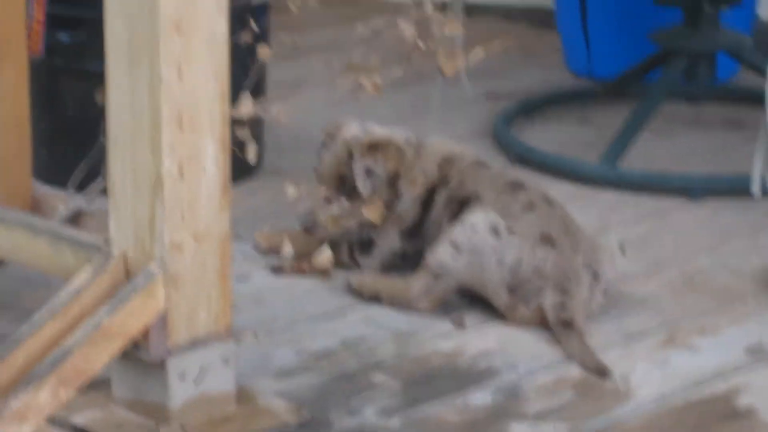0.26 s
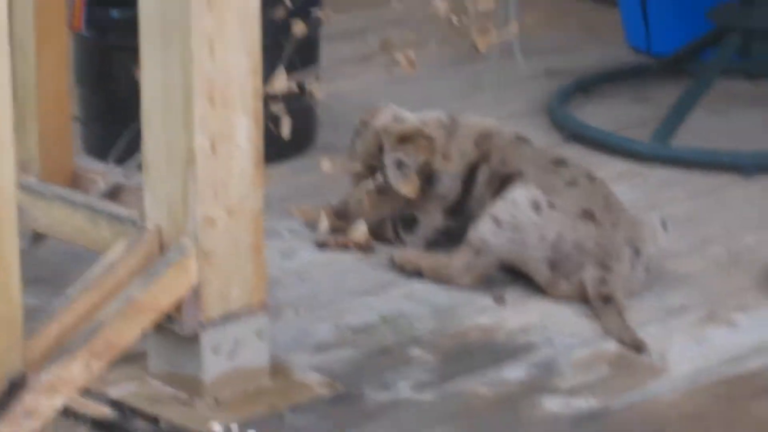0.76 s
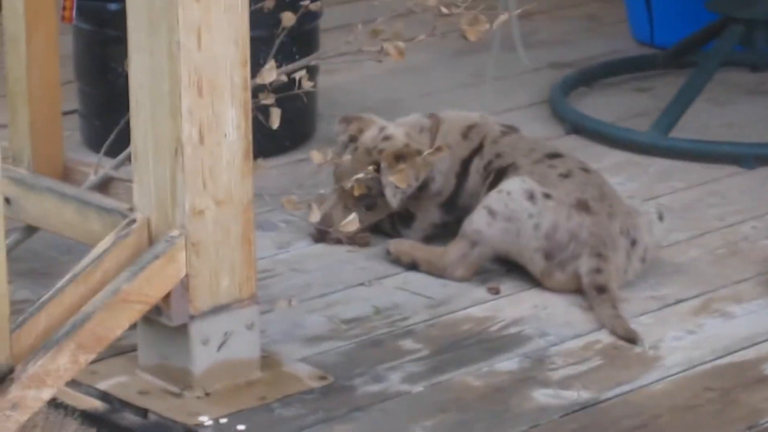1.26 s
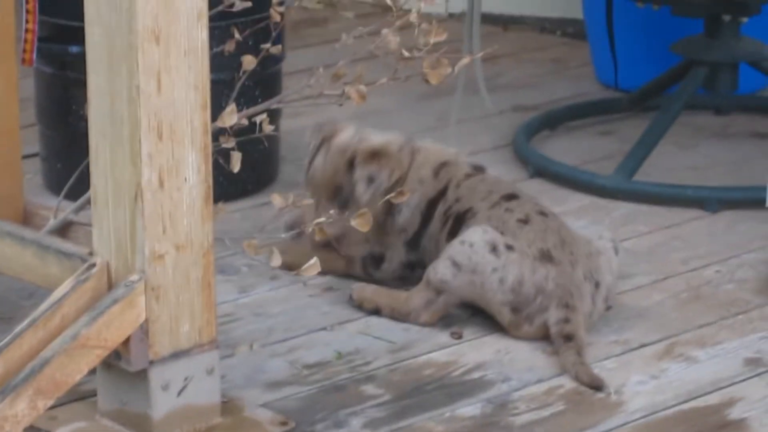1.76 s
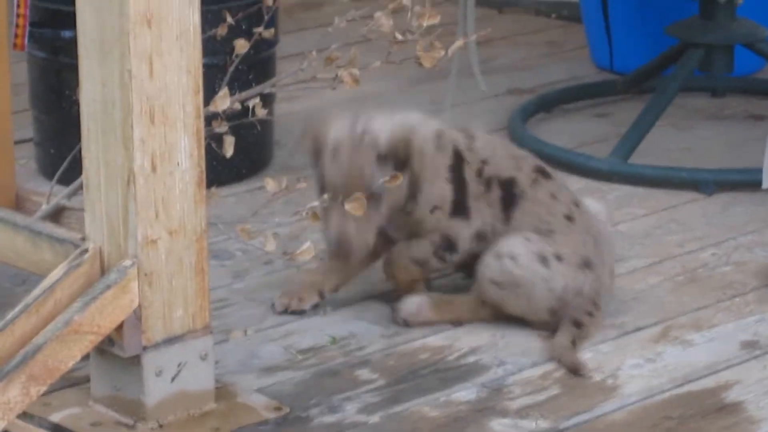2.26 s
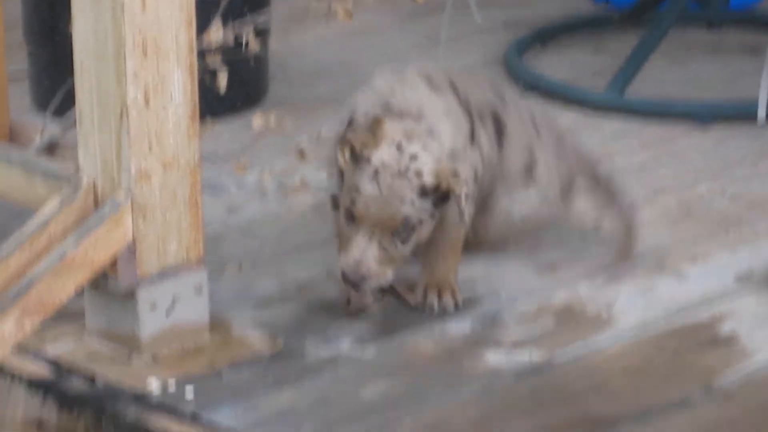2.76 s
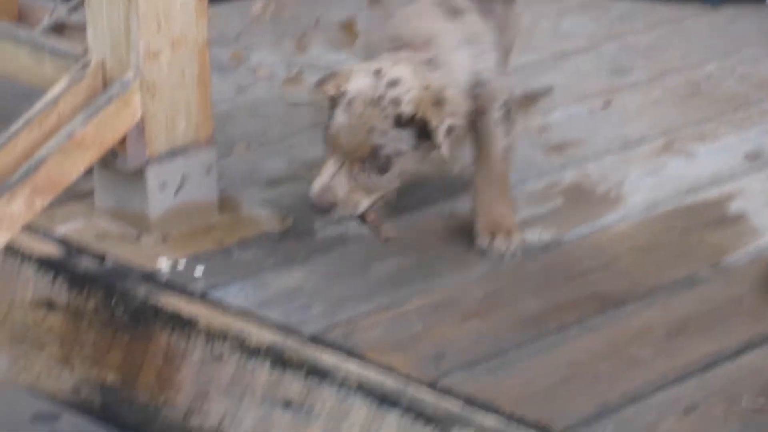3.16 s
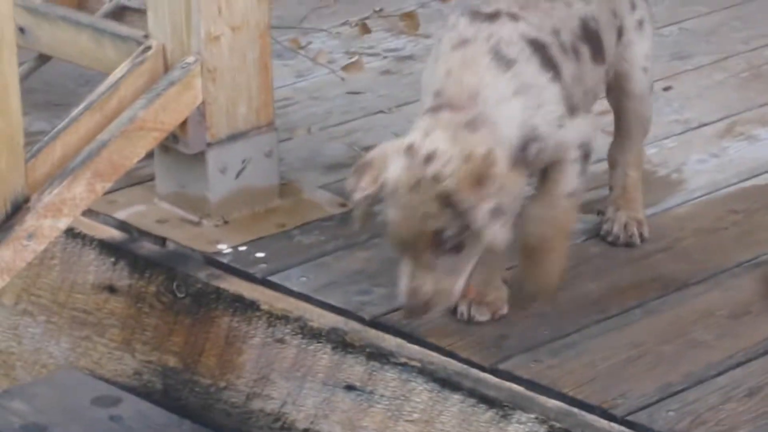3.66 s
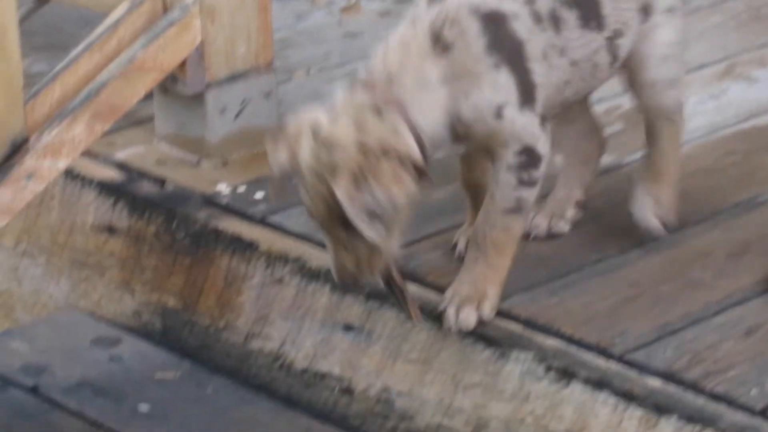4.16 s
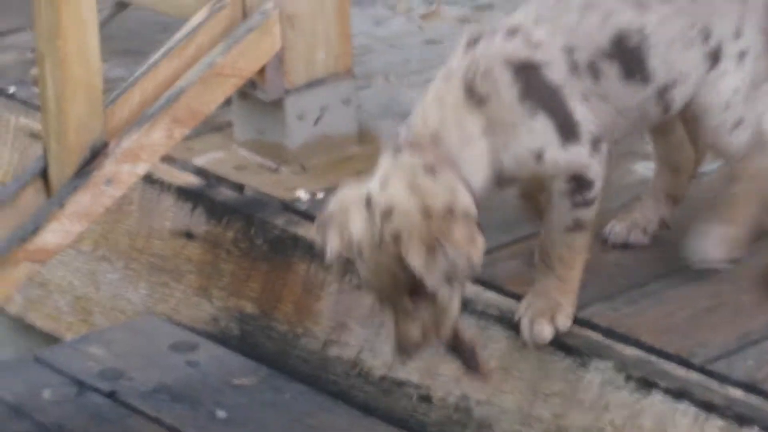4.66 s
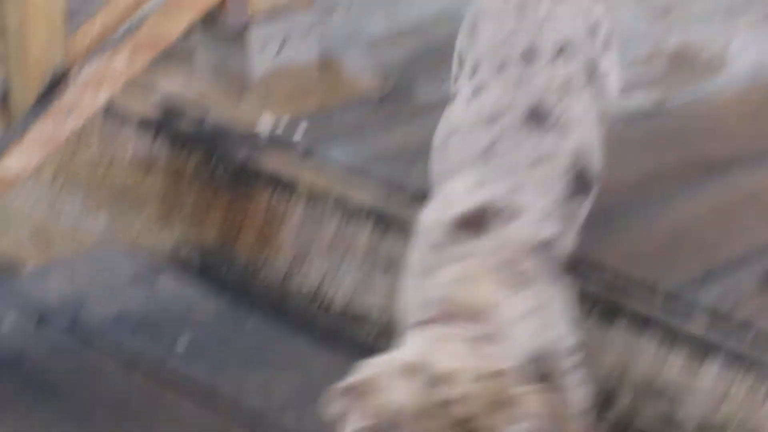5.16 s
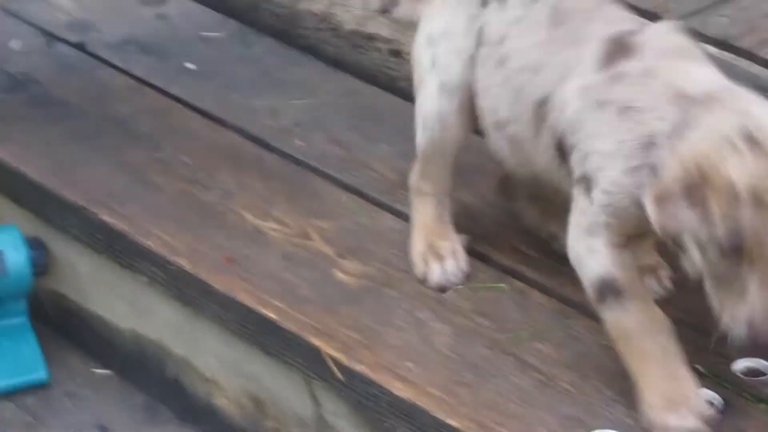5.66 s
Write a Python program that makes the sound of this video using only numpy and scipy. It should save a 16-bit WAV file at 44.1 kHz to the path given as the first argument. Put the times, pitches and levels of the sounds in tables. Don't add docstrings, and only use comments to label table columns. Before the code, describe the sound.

A puppy stirs on a wooden deck with one sharp close claw knock and soft pad thuds, while small birds chirp over a faint outdoor hush.

```python
import sys
import numpy as np
from scipy import signal
from scipy.fft import rfft, irfft, next_fast_len
from scipy.io import wavfile
from scipy.ndimage import uniform_filter1d

SR = 44100
rng = np.random.default_rng(int(sys.argv[2]) if len(sys.argv) > 2 else 0)


def unload_audio(sound):
    columns = np.transpose(np.atleast_2d(sound))
    steps = np.round(np.clip(columns, -1, 1) * 32767)
    wavfile.write(sys.argv[1], SR, steps.astype(np.int16))


def voltage_ratio(level):
    return 10 ** (np.asarray(level, float) / 20)


N = 260190
TOP_HZ = 10560


def along(points, hz):
    f, v = np.transpose(points)
    return np.interp(np.log(hz + 1), np.log(f + 1), v)


def curves(rows, t):
    s, *cols = np.transpose(rows)
    return [np.interp(t, s, c) for c in cols]


def filtered(x, response):
    m = next_fast_len(N + 8192)
    return irfft(rfft(x, m) * response(np.fft.rfftfreq(m, 1 / SR)), m)[..., :N]


def noise(response, patchy_db):
    z = signal.stft(rng.standard_normal(N + 512), nperseg=512)[2]
    field = uniform_filter1d(rng.standard_normal(z.shape), 6, 0)
    field = uniform_filter1d(field, 10, 1)
    patchy = signal.istft(z * voltage_ratio(patchy_db * field / field.std()), nperseg=512)[1][:N]
    x = filtered(patchy, response)
    return x / x.std()


def add(bus, s, x):
    part = bus[round(s * SR):][:len(x)]
    part += x[:len(part)]


def clock(ms):
    return np.arange(round(ms * SR / 1000)) / SR


def strokes(rows):
    t = np.arange(N) / SR
    power = 0
    for s, db, fall in rows:
        away = np.maximum((t - s) / fall, (s - t) / (0.5 * fall))
        power = power + voltage_ratio(db - 20 * away) ** 2
    return np.sqrt(power)


# start in seconds, peak in dB, brightness in dB.
CLAW_TAPS = [(0.241, -46, 2), (0.313, -37.5, 8), (2.379, -31, -14), (2.612, -58, -23), (3.077, -46, 13),
             (5.037, -42, -2), (5.042, -33, 2), (5.046, -34, 5), (5.151, -39, 13.5), (5.172, -36, 10),
             (5.526, -39.5, 3), (5.66, -34, -7), (5.692, -50, -21), (5.697, -35, -19), (5.702, -44, -12),
             (5.705, -41, -15), (5.72, -52, -10), (5.798, -38, -21), (5.806, -42, -23)]
# start in seconds, peak in dB, brightness in dB, ring as a ratio.
CLOSE_KNOCKS = [
    (2.397, -16.5, -15, .45),
    (2.4085, -22, -10, .6),
    (2.4117, -1.2, 0, .27),
    (2.4146, -16, -7, .6),
    (2.419, -16.5, -20, .5),
    (5.879, -21.5, -19, .21),
]
# pitch in Hz, level in dB, t60 in seconds, share of brightness 0-1.
BOARD_MODES = [(700, -15, 0.024, 0), (1060, -5.5, 0.069, 0.3), (1770, 1, 0.042, 0.1),
               (2050, -9, 0.074, 0.3), (2910, -1, 0.035, 0.86), (4460, -1.5, 0.0214, 0.46),
               (4710, -2, 0.021, 1), (6550, -9, 0.013, 1), (7800, -14, 0.016, 1), (9200, -12, 0.012, 0.8)]


def claws():
    bus, t = np.zeros(N), clock(120)
    onset = np.sin(np.pi / 2 * np.minimum(t / .0007, 1)) ** 2
    taps = [(s, db, bright_db, 0.26 * np.exp(-0.06 * bright_db)) for s, db, bright_db in CLAW_TAPS]
    for s, db, bright_db, ring in taps + CLOSE_KNOCKS:
        modes = 0
        for hz, level, t60, share in BOARD_MODES:
            mode_db = level + share * bright_db + rng.normal(0, .4)
            modes = modes + voltage_ratio(mode_db - 60 * t / (ring * t60)) * np.sin(2 * np.pi * hz * t)
        add(bus, s, voltage_ratio(db - 1) * modes * onset)
    bus = signal.sosfilt(signal.butter(3, 620, "high", fs=SR, output="sos"), bus)
    return signal.lfilter(*signal.iirnotch(3680, 5, SR), bus)


# start in seconds, peak in dB, board pitch in Hz.
PAD_STEPS = [(2.3, -37, 101), (2.407, -40, 132), (2.576, -40, 148), (2.63, -47, 111), (4.965, -51, 513.5),
             (5.039, -43, 470), (5.046, -34, 627), (5.053, -43, 346), (5.059, -40, 197),
             (5.086, -40, 139.2), (5.13, -48, 126), (5.19, -45, 195), (5.154, -40, 243), (5.533, -40, 344),
             (5.657, -40, 555), (5.722, -36, 553), (5.75, -41, 545), (5.676, -41, 168), (5.716, -45, 402),
             (5.728, -38, 183)]
# start in seconds, peak in dB, pitch in Hz, t60 in seconds.
FLAT_PAD = (5.3064, -28.5, 240, .016)


def pads():
    bus, t = np.zeros(N), clock(120)
    steps = [(s, db, hz, 13 / hz) for s, db, hz in PAD_STEPS]
    for s, db, hz, t60 in steps + [FLAT_PAD]:
        soft_onset = 1 - np.exp(-t * hz * 3)
        add(bus, s, voltage_ratio(db - 60 * t / t60) * np.sin(2 * np.pi * hz * t) * soft_onset)
    return bus


# frequency in Hz, level in dB.
DRAG_COLOUR = [(250, -39), (600, -5), (1000, 3), (1800, -10.5), (3500, -12.5), (8000, -22), (11000, -30)]
# peak time in seconds, peak in dB, seconds to fall 20 dB.
DRAG_STROKES = [
    (.15, -51.5, .15),
    (.2, -50, 0.23),
    (.85, -57, 1.2),
    (2.36, -53, 0.23),
    (2.7, -61.5, 3.5),
    (3.5, -77, 0.47),
    (4.87, -58, 0.44),
    (5.04, -54, 0.065),
    (5.9, -54.5, 1.7),
]


def drags():
    rub = noise(lambda hz: voltage_ratio(along(DRAG_COLOUR, hz)), patchy_db=4)
    return voltage_ratio(3.5) * strokes(DRAG_STROKES) * rub


def puppy():
    return claws() + pads() + drags()


# frequency in Hz, level in dB.
BEAK_GAIN = [(1500, -10.5), (2500, -2), (4500, -4), (6500, 2), (9000, -1), (10200, -3), (11000, -18)]


def voice(pitch, partials_db, edge, flutter_db=3):
    phase = 2 * np.pi * np.cumsum(pitch) / SR
    knots = rng.standard_normal((4, 80))
    tone = 0
    for k, db in enumerate(partials_db, 1):
        flicker_db = flutter_db * np.interp(np.arange(len(pitch)) / SR * 500, np.arange(80), knots[k - 1])
        gain = voltage_ratio(db + along(BEAK_GAIN, k * pitch) + flicker_db) * (k * pitch < SR / 2)
        tone = tone + gain * np.sin(k * phase)
    return np.sqrt(2) * tone * signal.windows.tukey(len(pitch), np.clip(edge, 0, 1))


# delay in ms, level in dB.
WALL_ECHOES = [(4.5, -8), (9, -11), (15, -13)]
# frequency in Hz, t60 in seconds.
YARD_DECAY = [(1500, 0.15), (4000, 0.17), (7000, 0.17), (10500, 0.25)]
# frequency in Hz, level in dB.
SCATTER_COLOUR = [(1500, -2), (3000, -1), (5500, 2), (9000, -1.5), (11000, -6.5)]


def in_yard(note, echo_db):
    hz, t, z = signal.stft(rng.standard_normal(SR // 6), SR, nperseg=128)
    decay_db = along(SCATTER_COLOUR, hz)[:, None] - 60 * t / along(YARD_DECAY, hz)[:, None]
    tail = signal.istft(z * voltage_ratio(decay_db), SR, nperseg=128)[1]
    answer = voltage_ratio(2.5) * tail / np.linalg.norm(tail)
    chances = rng.standard_normal((len(WALL_ECHOES), 34))
    for (ms, db), (shift, size, *rough) in zip(WALL_ECHOES, chances):
        blur = np.array(rough) / np.sqrt(32)
        answer[round((ms + shift) * SR / 1000):][:32] += voltage_ratio(db + 2.5 * size) * blur
    answer *= voltage_ratio(echo_db)
    answer[0] += 1
    return signal.fftconvolve(note, answer)


# start in seconds, fall time in ms, level in dB.
OPEN_PERCH = [(0.239, 4.4, -59), (1.1498, 7.4, -50.5), (1.8265, 5.4, -52.5), (2.0056, 6.2, -44.5),
              (2.0953, 5.0, -53.5), (2.87, 6, -42), (2.9864, 6.5, -43.5), (3.1268, 3.8, -48),
              (3.2785, 2.8, -55.5), (3.663, 4.0, -49), (3.811, 5.1, -42), (4.644, 7.7, -56)]
FENCE_PERCH = [(0.5216, 3.3, -65), (0.5817, 2.3, -60), (0.6951, 4.4, -64), (0.884, 2.3, -64),
               (1.4128, 5.9, -56), (2.1487, 4.3, -57), (3.2396, 4.1, -49), (4.8284, 3.5, -53),
               (5.2271, 2.9, -45.5), (5.4325, 3.7, -51.5), (5.4522, 4, -54), (5.568, 4.0, -49.5),
               (5.852, 3.8, -55.5)]
HIDDEN_PERCH = [
    (1.6914, 4.2, -59.5),
    (2.3553, 4.5, -50),
    (3.697, 4, -48.5),
    (3.928, 2.7, -57.5),
    (5.7127, 3.8, -54),
]
ROOF_PERCH = [
    (1.582, 3.3, -67.5),
    (1.934, 5, -64.5),
    (4.2125, 4.9, -60.5),
    (4.2256, 5.5, -58.5),
    (4.4104, 6.7, -69),
]
# overtones in dB, echo in dB.
PERCH_SOUND = [
    (4, -3.5),
    (-5.5, 2.4),
    (-3.5, 2),
    (1, 8),
]


def chips():
    bus, t = np.zeros(N), clock(15.8)
    perches = (OPEN_PERCH, FENCE_PERCH, HIDDEN_PERCH, ROOF_PERCH)
    for rows, (perch_db, echo_db) in zip(perches, PERCH_SOUND):
        for s, fall_ms, db in rows:
            over_db = perch_db - 0.35 * (fall_ms - 6.2)
            pitch = 1850 + 6800 * np.exp(-(1000 * t / (fall_ms + 1.7)) ** 1.7)
            note = voice(pitch, [0, over_db - 5, over_db - 8, over_db - 11], edge=.13)
            note = note * voltage_ratio(db + 5.5 - 330 * t)
            add(bus, s - .0022, in_yard(note, echo_db + .3))
    return bus


# start in seconds, start pitch in Hz, level in dB.
NEAR_CHATTER = [
    (0.348, 3550, -61),
    (4.025, 3110, -47.5),
    (4.107, 3250, -48),
    (4.4278, 3380, -49),
    (4.504, 3400, -48),
    (4.583, 3230, -48.5),
    (4.6623, 3420, -47.5),
    (4.745, 3140, -48.5),
    (4.834, 3280, -48.5),
]
# start in seconds, start pitch in Hz, level in dB.
DISTANT_CHATTER = [
    (0.08, 3040, -64.5),
    (0.111, 2890, -59.5),
    (0.243, 2930, -59.5),
    (0.302, 3290, -59),
    (0.5108, 2590, -58),
    (0.631, 2990, -62),
    (0.7034, 3421, -83),
    (1.2026, 3150, -62.5),
    (4.9535, 2750, -61),
]
# start in seconds, start pitch in Hz, level in dB, overtones in dB.
NASAL_NOTES = [(0.2084, 2110, -46.5, -0.5), (0.3298, 1994, -46, 1), (0.7002, 2084, -50.5, 3),
               (1.0824, 2090, -52.5, 7), (1.121, 2250, -55.5, 12.5), (1.292, 1984, -53, 3.5),
               (1.4532, 2107, -40.5, -1), (3.1798, 2024, -44.5, -6), (3.197, 2020, -53, 3),
               (3.259, 2260, -53, 1), (3.286, 2000, -48, -8), (3.3255, 2050, -51, 1),
               (3.5325, 2030, -47.5, -3), (3.5462, 2060, -49.5, -0.5), (4.197, 2050, -50, 1),
               (4.215, 1950, -49, -5), (4.238, 2110, -54, -1), (5.177, 1950, -52, 5.5),
               (5.187, 1925, -56, 4)]
# note in ms, end pitch over start, 2nd partial in dB, 3rd in dB, far wall in dB.
CALLER_VOICES = [
    (18, .63, -3, 1.2, -4),
    (18, 0.56, 6, 3, -11),
    (20, .91, -6.5, -8, -42),
]
CALLER_ECHO = [
    -5,
    -5,
    -8,
]


def calls():
    bus = np.zeros(N)
    callers = (NEAR_CHATTER, DISTANT_CHATTER, NASAL_NOTES)
    for rows, caller, echo_db in zip(callers, CALLER_VOICES, CALLER_ECHO):
        ms, drop, second_db, third_db, again_db = caller
        t = clock(ms + 3.3)
        for s, start_hz, db, *over_db in rows:
            upper_db = np.array([second_db - 1.0, third_db - 4.0, third_db - 9.5]) + sum(over_db)
            pitch = start_hz * (1 - (1 - drop) * (1000 * t / ms) ** 1.5)
            note = voice(pitch, [0, *upper_db], edge=0.51) * voltage_ratio(2.0 - 130 * t)
            add(bus, s - .001, voltage_ratio(db) * in_yard(note, echo_db))
            add(bus, s + 0.016, voltage_ratio(db + again_db) * in_yard(note, echo_db))
    return bus


# start in seconds, start pitch in Hz, goal pitch in Hz, length in ms, level in dB.
GLIDES = [(.777, 6900, 7100, 37, -61), (.82, 7130, 6768, 43, -70), (1.795, 5000, 9170, 9.5, -63),
          (2.178, 5921, 1255, 14, -40.5), (2.181, 10200, 2300, 9.7, -41.5), (3.65, 5672, 4709, 59, -50),
          (4.346, 2805, 2650, 7.6, -42), (4.351, 2750, 5950, 18, -45), (4.414, 5600, 700, 9.2, -51),
          (4.819, 5600, 1500, 7.8, -48.5), (4.361, 2780, 1380, 16, -48.5)]
# start in seconds, start pitch in Hz, length in ms, level in dB.
SCOOPS = [
    (3.766, 5860, 8.1, -50),
    (3.778, 5050, 12, -44),
    (3.793, 3420, 8.5, -39),
    (3.807, 2685, 10, -44),
    (3.821, 3930, 17, -59.5),
    (4.295, 6180, 8, -41.5),
    (4.307, 3900, 8.7, -38.5),
    (4.321, 2880, 3, -38),
    (4.335, 2380, 8.4, -39),
]


def whistles():
    bus = np.zeros(N)
    slow = [(*row, 13) for row in GLIDES]
    fast = [(s, hz, 6500, ms, db, 2.5) for s, hz, ms, db in SCOOPS]
    for s, start_hz, goal_hz, ms, db, glide_ms in slow + fast:
        pitch = goal_hz + (start_hz - goal_hz) * np.exp(-1000 * clock(ms) / glide_ms)
        note = voice(pitch, [0, -7], edge=.25)
        add(bus, s, voltage_ratio(db) * in_yard(note, echo_db=-5))
    return bus


# time in seconds, centre pitch in Hz, level in dB.
TRILL_PATH = [
    (1.958, 7810, -50),
    (1.964, 7800, -41),
    (1.995, 7863, -32),
    (2.015, 7800, -33.5),
    (2.045, 7530, -35),
    (2.075, 7180, -43),
    (2.09, 6500, -37),
    (2.1, 6100, -60),
]


def trill():
    bus = np.zeros(N)
    start_s, end_s = TRILL_PATH[0][0], TRILL_PATH[-1][0]
    t = start_s + clock(1000 * (end_s - start_s))
    centre, db = curves(TRILL_PATH, t)
    warble = np.cos(2 * np.pi * 107.9 * (t - 2.0025))
    pitch = centre + .56 * (centre - 5300) * warble
    level = voltage_ratio(db - 4.0 - 1.1 * warble + 2.5 * warble ** 2)
    note = voice(pitch, [0], edge=0.051, flutter_db=3.2) * level
    add(bus, start_s, in_yard(note, echo_db=-7))
    return bus


def birds():
    return chips() + calls() + whistles() + trill()


# frequency in Hz, density in dB per Hz.
HUSH_COLOUR = [(13, -37), (22, -4), (258, 0), (548, -3), (1670, -7.5), (7510, -16), (9990, -18.5),
               (10800, -22.5)]
# time in seconds, level in dB.
RUMBLE_LEVEL = [(0.0, -57), (0.34, -55.5), (1.08, -56.5), (1.63, -54.5), (1.89, -57), (2.25, -50.5),
                (2.7, -55), (3.32, -53), (3.6, -54), (3.84, -52.5), (4.5, -56), (4.7, -56.5), (4.99, -52),
                (5.27, -52), (5.9, -54.5)]
# peak time in seconds, peak in dB,
# seconds to rise 20 dB as a negative number.
HISS_SWELLS = [
    (2.04, -57, -2),
    (2.35, -47.5, -0.3),
    (3.84, -56, -0.4),
    (5.1, -57, -0.5),
]


def hush():
    rumble_db, = curves(RUMBLE_LEVEL, np.arange(N) / SR)
    colour = lambda hz: voltage_ratio(along(HUSH_COLOUR, hz))
    low = lambda hz: 1 / (1 + (hz / 500) ** 4)
    rumble = noise(lambda hz: colour(hz) * np.sqrt(low(hz)), patchy_db=1.5)
    hiss = noise(lambda hz: colour(hz) * np.sqrt(1 - low(hz)) * (hz < TOP_HZ), patchy_db=0.88)
    return voltage_ratio(rumble_db) * rumble + np.hypot(voltage_ratio(-52.5), strokes(HISS_SWELLS)) * hiss


def scene():
    return np.tile(puppy() + birds() + hush(), (2, 1))


def roll_off(x):
    return signal.sosfilt(signal.butter(12, 11110, fs=SR, output="sos"), x)


# start in seconds, end in seconds, side in dB under mid.
PARTED = [
    (1.96, 2.05, -21),
    (2.35, 2.46, -22),
    (2.85, 2.91, -18),
    (4.31, 4.38, -18),
]


def record(dry):
    fizz, length = np.zeros(N), len(clock(92))
    add(fizz, 2.37, voltage_ratio(-43.5) * signal.windows.tukey(length, .4) * rng.standard_normal(length))
    x = .98 * (dry[0] + fizz)
    rounded = x / (1 + np.abs(x / .9) ** 8) ** (1 / 8)
    mid = filtered(rounded, lambda hz: hz < TOP_HZ)
    hz, t, z = signal.stft(mid, SR, nperseg=512)
    band = (hz > 3500) & (hz < 7000)
    loud = np.linalg.norm(z[band], axis=0) > voltage_ratio(-42)
    gate = voltage_ratio(-28) * np.outer(band, loud)
    parted = sum(voltage_ratio(db) * ((t > start) & (t < end)) for start, end, db in PARTED)
    gate = np.maximum(gate, parted)
    scramble = np.exp(2j * np.pi * rng.random(z.shape))
    side = signal.istft(z * gate * (.9 * scramble - .45), SR, nperseg=512)[1][:N]
    return roll_off(np.array([mid + side, mid - side]))


dry = scene()
out = record(dry)
unload_audio(out)
```